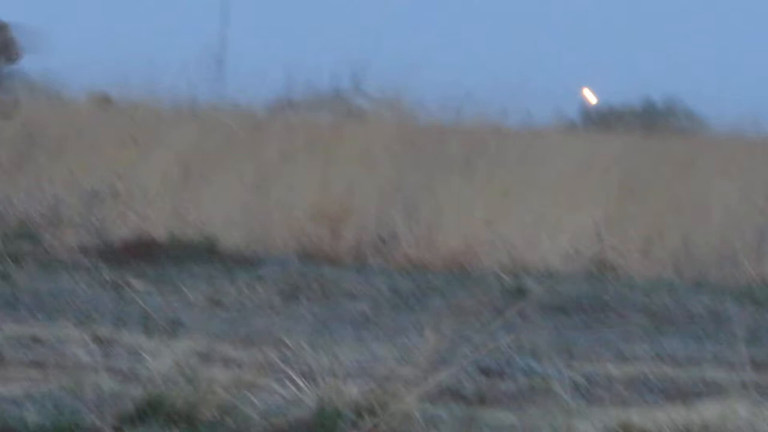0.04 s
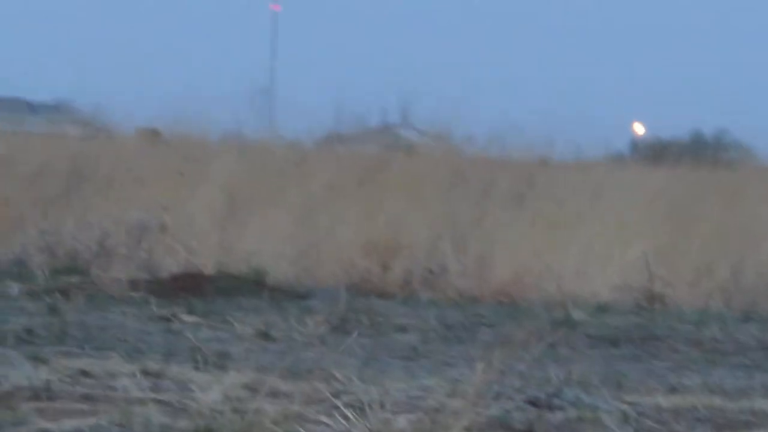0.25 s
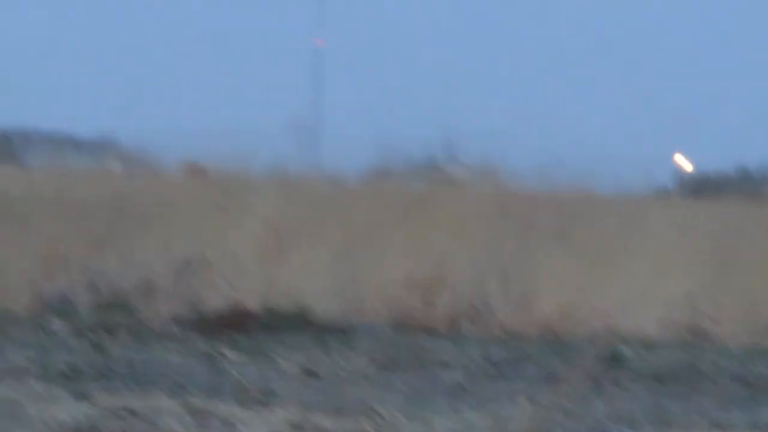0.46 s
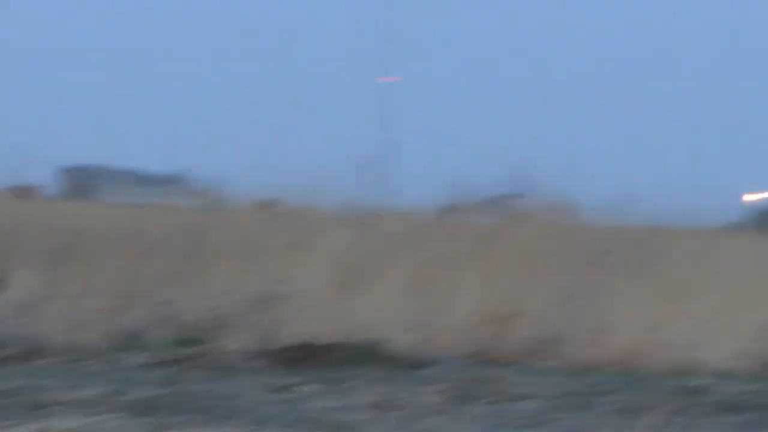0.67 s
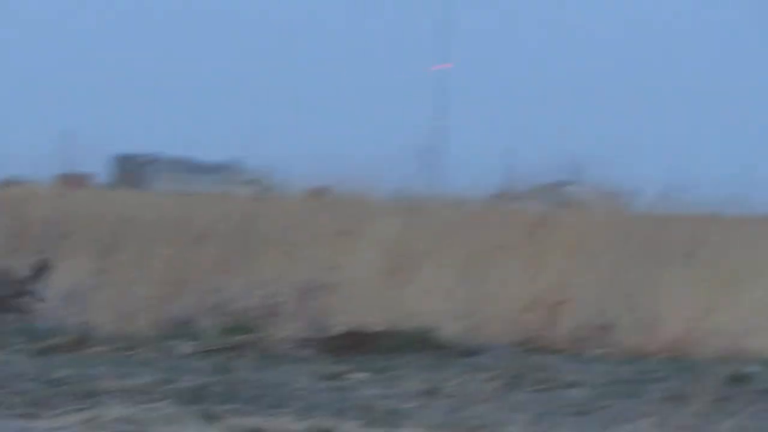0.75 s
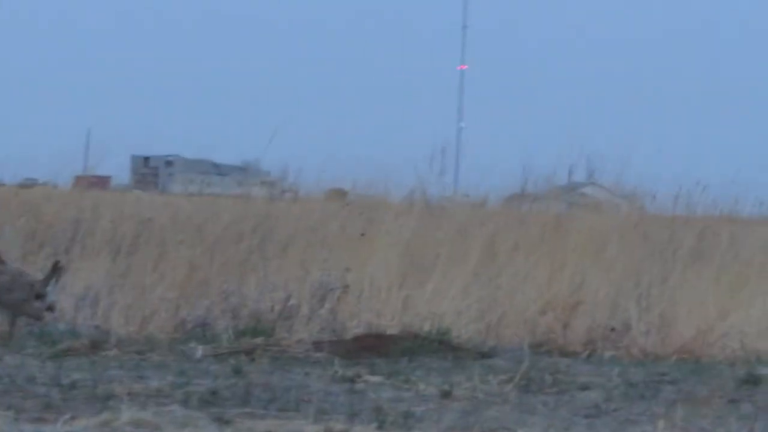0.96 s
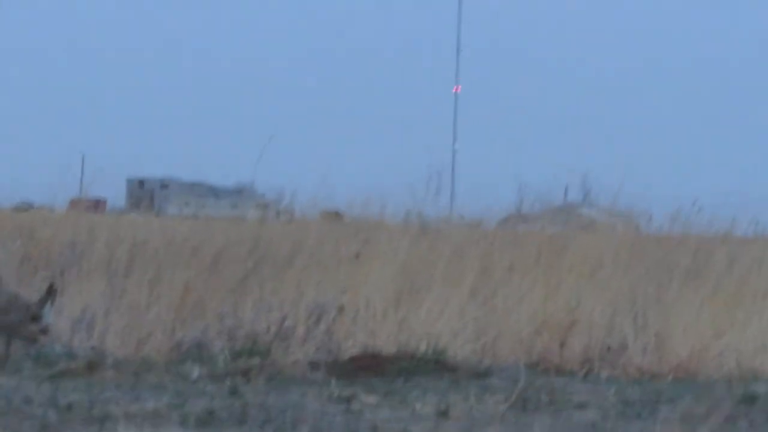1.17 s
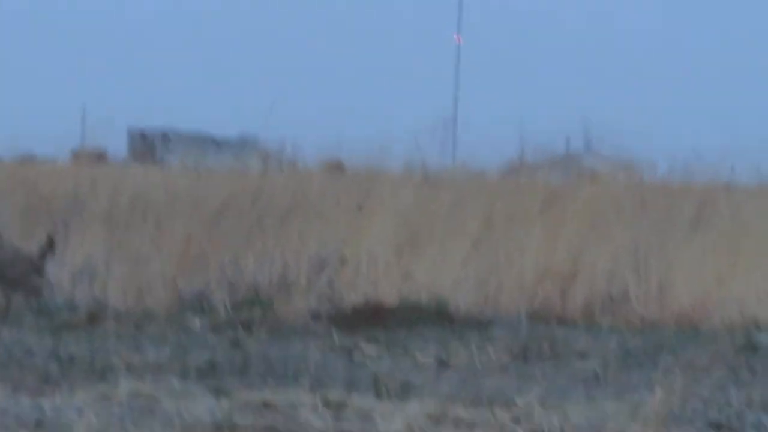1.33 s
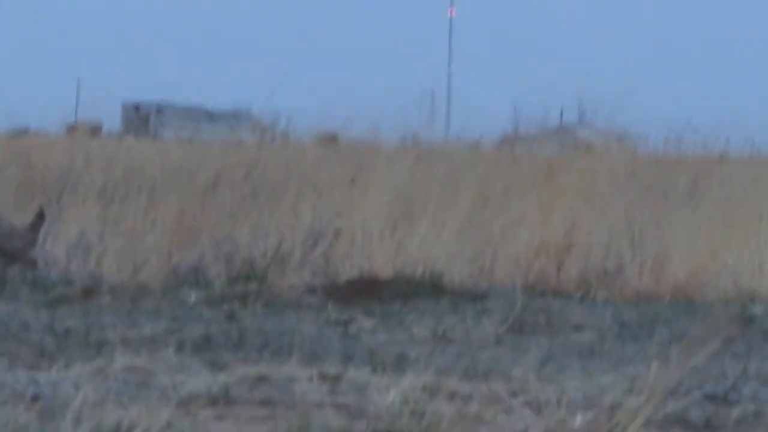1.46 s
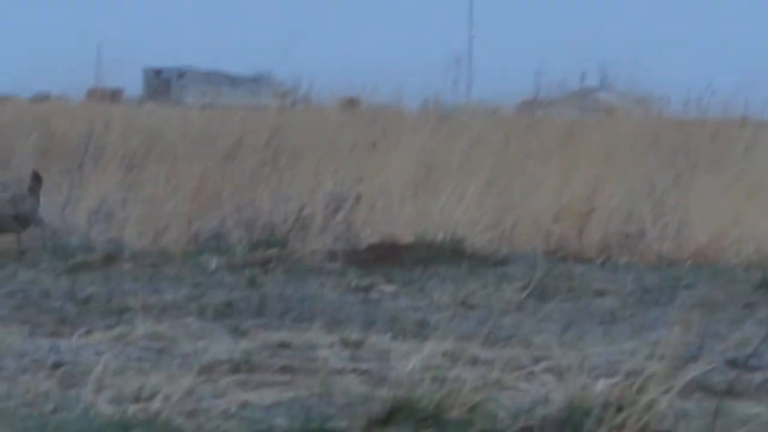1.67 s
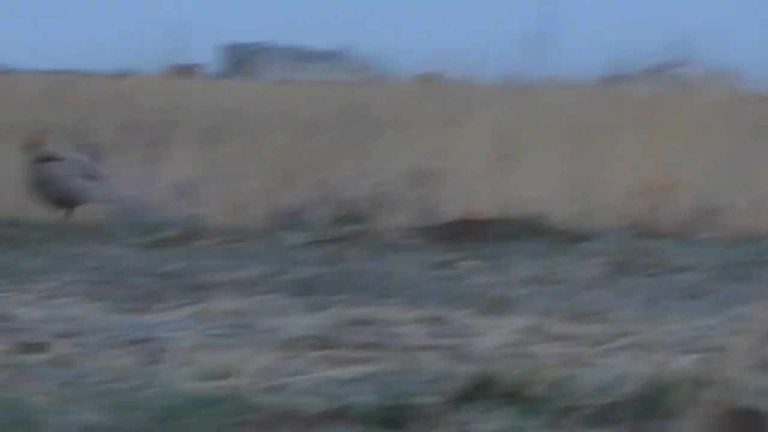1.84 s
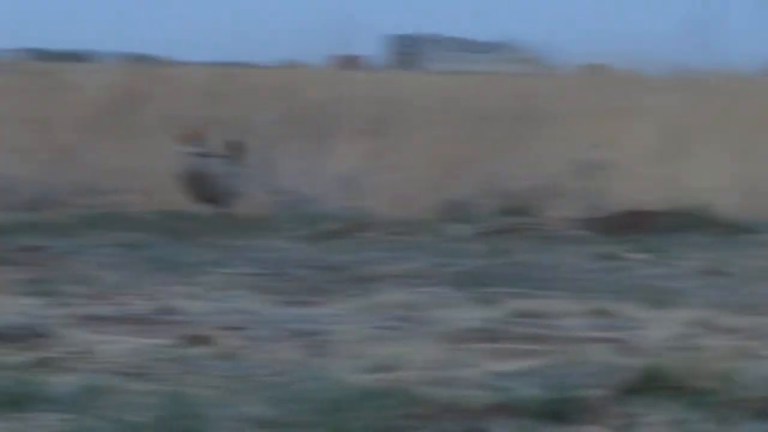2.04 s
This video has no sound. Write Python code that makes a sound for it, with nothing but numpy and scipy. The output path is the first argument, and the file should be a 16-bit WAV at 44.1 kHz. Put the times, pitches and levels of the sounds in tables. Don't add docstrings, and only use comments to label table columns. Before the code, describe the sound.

Distant grouse give short clucks and nasal whines, half buried under rumbling, overloading wind gusts

```python
import sys
import numpy as np
from scipy import signal
from scipy.fft import rfft, irfft, next_fast_len
from scipy.io import wavfile
from scipy.ndimage import uniform_filter1d, map_coordinates

SR = 44100
rng = np.random.default_rng(int(sys.argv[2]) if len(sys.argv) > 2 else 0)


def master_out(mix):
    frames = np.transpose(np.atleast_2d(mix))
    ceiling = np.clip(frames, -1, 1)
    pcm = np.round(ceiling * 32767).astype(np.int16)
    wavfile.write(sys.argv[1], SR, pcm)


def ratio_of_db(decibels):
    return 10 ** (np.asarray(decibels, float) / 20)


N = 92610

# (frequency [Hz], density [dB per Hz])
FIELD_SPECTRUM = [(250, -5), (500, -0.5), (1000, -1), (2000, -10), (3300, -16.5), (5000, -19),
                  (13300, -26.5), (15200, -64.5)]
# (frequency [Hz], correlation [-1..1])
FIELD_LIKENESS = [(500, 0.2), (1500, 0.75), (3000, .3), (6000, 0.07), (13000, -.4)]
# (start [s], length [s], rumble [dB], flutter over rumble [dB])
GUSTS = [(0.064, 0.198, -16, -15.5), (1.328, 0.076, -14.5, -13.5), (0.324, 0.032, -9, -17.5),
         (0.38, 0.098, -11, -24), (0.396, 0.032, -20, -5.5), (0.457, .035, -12, -16),
         (0.487, 0.031, -5.5, -12.5), (0.544, 0.013, -3.5, -11), (0.562, 0.03, 16.5, -7),
         (0.622, 0.027, 6.5, 3), (0.643, 0.026, 13.5, -33.5), (0.759, 0.023, 9.5, -15),
         (0.868, 0.021, -6, -28), (0.935, 0.016, 10.5, -10), (0.963, 0.051, 5, 2), (0.996, 0.023, 4.5, -24),
         (1.04, 0.038, 5, -6.5), (1.121, 0.073, 7.5, -20.5), (1.17, 0.053, 1, -5), (1.21, 0.032, 4, -6.5),
         (1.243, 0.043, 8.5, -1), (1.31, 0.071, -11, -7.5), (1.444, 0.036, -7, -10.5),
         (1.505, 0.028, 2, -25), (1.54, 0.077, -24, 7), (1.616, 0.055, -9, -5.5), (1.701, 0.051, -7, -14.5),
         (1.773, 0.054, -1.5, -17), (1.802, 0.039, -14.5, 0), (2.006, 0.018, -19.5, -10)]
# (frequency [Hz], density [dB per Hz])
RUMBLE_SPECTRUM = [(15, -16), (40, -3), (70, 1.5), (110, -1.5), (160, -7), (250, -27.5), (400, -83.5)]
# (frequency [Hz], density [dB per Hz])
FLUTTER_SPECTRUM = [(80, -41), (150, 2), (220, 2.5), (350, -8), (550, -23), (900, -36.5), (1500, -59),
                    (3000, -93)]
# (time [s], signed size [full scale], width [s])
PUSHES = [(0.5452, 1.5, 0.00079), (0.5477, 2.5, 0.00198), (0.5527, 0.9, 0.00053), (0.627, 3.5, 0.0017),
          (.648, -6.5, 0.00041), (.932, 5, 0.00039), (0.96, -5.5, 0.00056), (0.995, 7.5, 0.00055),
          (1.167, -1, 0.0019), (.98, 4.5, 0.00093), (1.004, -2, 0.00046), (1.2454, 9, 0.0012),
          (1.2591, 7.5, 0.0011), (1.581, 0.42, 0.00048)]
# (start [s], length [s], level [dB], from [Hz], to [Hz])
CHIRPS = [
    (.28, .03, -58, 3300, 3500),
    (2.04, .02, -52, 2330, 2230),
    (1.15, .05, -54, 2550, 2950),
]
# (start [s], length [s], level [dB], second-partial pitch [Hz], scoop [Hz])
CACKLES = [
    (0.247, 0.03, -34, 1478, 208),
    (0.36, 0.032, -33, 1546, 280),
    (0.472, 0.039, -42, 1267, 161),
    (1.656, 0.053, -40.5, 1420, 40),
    (1.81, .034, -44.5, 1464, 40),
    (1.955, 0.033, -40.5, 1443, 49.7),
]
# (time [s], pitch [Hz], level [dB])
YELP = [
    (.119, 1210, -51),
    (.132, 1318, -36.5),
    (.147, 1847, -34),
    (.158, 1372, -35.5),
    (.166, 1360, -31),
]
# (time [s], pitch [Hz], level [dB])
WHINES = [
    [(.515, 1280, -47.5), (.55, 1414, -49), (.6, 1560, -39), (.615, 1504, -34), (.645, 1814, -41)],
    [(.66, 1538, -43), (.705, 1515, -36.5), (.724, 1725, -41), (.742, 1474, -31.5), (.765, 1410, -42)],
    [(.912, 1269, -44), (.94, 1590, -45), (.98, 1597, -44), (1.04, 1545, -36.5), (1.074, 1380, -47)],
    [(1.205, 1330, -37), (1.245, 1600, -41), (1.27, 1466, -38.5), (1.315, 1470, -43)],
    [(1.44, 1446, -53), (1.456, 1590, -36), (1.48, 1632, -38), (1.51, 1572, -44), (1.528, 1390, -41)],
]
# (frequency [Hz], gain [dB])
THROAT = [(600, -36), (900, -27), (1300, -2), (1500, 0), (1800, -4), (2150, -16), (2500, -19), (2900, -34)]
# (time [s], gain [dB])
GAIN = [(0, -2), (.4, -1), (.55, -2.5), (.556, -26), (.8, -22), (1.1, -18), (1.24, -17.5), (1.246, -21.5),
        (1.5, -18), (1.75, -12.5), (2.1, -7.5)]
# (time [s], level [dB])
TICKS = [(.175, -37), (.34, -39), (.5448, -28), (.5478, -32), (.5497, -27), (.5522, -34), (.555, -34),
         (.6505, -36), (1.045, -40), (1.2407, -33), (1.2432, -23), (1.546, -45), (1.58, -43), (1.77, -43)]
# (centre [Hz], width [Hz])
SEAMS = [(3950, 200), (7900, 82)]

FIELD_DB = -46
WHISTLE_HZ, WHISTLE_CLIMB_HZ_PER_S, WHISTLE_DB = 8680, 95, -67
GUST_RISE_S, GUST_FALL_S = 0.003, 0.013
LULL_DB, LULL_FLUTTER_DB, LUMPS_DB, SHIELD_DB = -19, -21, 2, -5
PORT_TILT_DB, PORT_OWN_DB, OWN_BRIGHT_DB = 1.2344, -13.5, 3.5
ATTACK_S, RELEASE_S = 0.0035, 0.0059
SCOOP_S, SAG_SHARE = 0.0031, 0.8
CACKLE_FLUTTER_DB, WHINE_FLUTTER_DB = 1.6, 1.8
WAVER_SHARE, OWN_SHARE = 0.008, 1.2
SLAP_S, SLAP_DB = 0.024, -12.5
LEFT_LAG_SAMPLES = 2
START_S = 0.0945
TICK_S, TICK_RIGHT = 0.00002, -0.3
CLIP_TOP, CLIP_HARDNESS = 1.0, 60


def unit(x):
    return x / np.sqrt(np.mean(x ** 2) + 1e-20)


def along(points, hz):
    f, v = np.transpose(points)
    return np.interp(np.log(hz + 1), np.log(f + 1), v)


def wobble(rate_hz, count=N):
    knots = rng.standard_normal(1024)
    return map_coordinates(knots, [np.arange(count) * rate_hz / SR])


def filtered(x, response):
    m = next_fast_len(N + 8192)
    hz = np.fft.rfftfreq(m, 1 / SR)
    return irfft(rfft(x, m) * response(hz), m)[..., :N]


def noise(spectrum, count):
    white = rng.standard_normal((count, N))
    return unit(filtered(white, lambda hz: ratio_of_db(along(spectrum, hz)) * (hz > 10)))


def steady(x, span_s):
    power = np.abs(uniform_filter1d(x[0] ** 2, size=int(span_s * SR)))
    return x / np.sqrt(power + 0.076)


def field():
    def side_gain(hz):
        return np.tan(np.arccos(np.clip(along(FIELD_LIKENESS, hz), -0.9, 1)) / 2)

    t = np.arange(N) / SR
    mid, side = filtered(noise(FIELD_SPECTRUM, 2), lambda hz: np.array([np.ones_like(hz), side_gain(hz)]))
    hiss = ratio_of_db(FIELD_DB + 1.95 * wobble(8.7)) * np.array([mid + side, mid - side])
    cycles = (WHISTLE_HZ + WHISTLE_CLIMB_HZ_PER_S * t / 2) * t
    whistle = np.sin(2 * np.pi * cycles + 0.95 * wobble(25))
    return hiss + ratio_of_db(WHISTLE_DB + 0.73 * wobble(41)) * whistle


def port_air(spectrum, span_s, power, lumps_hz, own_db):
    shares = ratio_of_db(np.array([[0], [own_db], [own_db]]))
    turbulence = steady(noise(spectrum, 3), span_s) * shares
    return np.sqrt(power) * ratio_of_db(LUMPS_DB * wobble(lumps_hz)) * turbulence


def wind():
    t = np.arange(N) / SR
    low = ratio_of_db(2 * LULL_DB)
    high = ratio_of_db(2 * (LULL_DB + LULL_FLUTTER_DB))
    for s, length_s, db, bright_db in GUSTS:
        rise = np.clip((t - s) / GUST_RISE_S, -20, 0)
        fall = np.clip((t - s - length_s) / GUST_FALL_S, 0, 20)
        shape = np.exp(rise - fall) ** 2
        low = low + shape * ratio_of_db(2 * db)
        high = high + shape * ratio_of_db(2 * (db + bright_db))
    low, high = uniform_filter1d(np.array([low, high]), size=120)
    rumble = port_air(RUMBLE_SPECTRUM, 0.0303, low, 39.95, PORT_OWN_DB)
    flutter = port_air(FLUTTER_SPECTRUM, 0.0123, high, 70, PORT_OWN_DB + OWN_BRIGHT_DB)
    air = ratio_of_db(SHIELD_DB) * (rumble + flutter)
    shared = air[0] + sum(size * np.exp(-((t - s) / width_s) ** 2) for s, size, width_s in PUSHES)
    return shared * np.array([[ratio_of_db(PORT_TILT_DB)], [-ratio_of_db(-PORT_TILT_DB)]]) + air[1:]


def voice(t, hz, level_db, flutter_db):
    count = len(t)
    gate = np.clip((t - t[0]) / ATTACK_S, 0, 1) * np.clip((t[-1] - t) / RELEASE_S, 0, 1)
    f0 = hz / 2 * (1 + WAVER_SHARE * wobble(150, count))
    phase = 2 * np.pi * np.cumsum(f0) / SR
    tone = np.zeros(count)
    for k in range(1, 5):
        own_db = OWN_SHARE * flutter_db * wobble(71, count)
        tone += ratio_of_db(along(THROAT, k * f0) + own_db) * np.sin(k * phase)
    return np.sqrt(2) * gate * ratio_of_db(level_db + flutter_db * wobble(115, count)) * tone


def cackles():
    t, out = np.arange(N) / SR, np.zeros(N)
    for s, length_s, db, hz, scoop_hz in CACKLES:
        on = (t >= s) & (t < s + length_s)
        u = t[on] - s
        bend = np.exp(-u / SCOOP_S) + SAG_SHARE * (u / length_s) ** 2
        out[on] += voice(t[on], hz - scoop_hz * bend, db, CACKLE_FLUTTER_DB)
    return out


def whines():
    t, out = np.arange(N) / SR, np.zeros(N)
    for rows in [YELP] + WHINES:
        s, hz, db = np.transpose(rows)
        on = (t >= s[0]) & (t < s[-1])
        glide = uniform_filter1d(np.interp(t[on], s, hz), size=250)
        out[on] += voice(t[on], glide, np.interp(t[on], s, db), WHINE_FLUTTER_DB)
    return out


def chirps():
    t, out = np.arange(N) / SR, np.zeros(N)
    for s, length_s, db, from_hz, to_hz in CHIRPS:
        u = np.clip((t - s) / length_s, 0, 1)
        phase = 2 * np.pi * np.cumsum(from_hz + (to_hz - from_hz) * u) / SR
        out += ratio_of_db(db) * np.sin(np.pi * u) * np.sin(phase)
    return out


def birds():
    calls = cackles() + whines() + chirps()
    calls = calls + ratio_of_db(SLAP_DB) * np.roll(calls, round(SLAP_S * SR))
    tail_s = np.arange(SR // 10) / SR
    echo = rng.standard_normal((2, SR // 10)) * ratio_of_db(-60 * tail_s / 0.28)
    wet = signal.fftconvolve(calls[None], echo / np.linalg.norm(echo[0]), axes=1)[:, :N]
    direct = np.array([np.roll(calls, LEFT_LAG_SAMPLES), calls]) * ratio_of_db(np.array([[0.2], [-0.2]]))
    return direct + ratio_of_db(-15.5) * wet


def scene():
    return field() + wind() + birds()


def ticks():
    t = np.arange(N) / SR
    clicks = sum(ratio_of_db(db) * (t >= s) * np.exp(-np.abs(t - s) / TICK_S) for s, db in TICKS)
    return clicks * np.array([[1], [TICK_RIGHT]])


def roll_off(x):
    return signal.sosfilt(signal.butter(12, 15800, fs=SR, output="sos"), x)


def record(dry):
    def gaps(hz):
        return np.prod([1 - 0.75 * np.exp(-((hz - c) / w) ** 2) for c, w in SEAMS], axis=0)

    t = np.arange(N) / SR
    opening = np.clip((t - START_S) * SR / 10, 0, 1)
    x = filtered(dry, gaps) * ratio_of_db(np.interp(t, *np.transpose(GAIN))) * opening
    x = x / (1 + np.abs(x / CLIP_TOP) ** CLIP_HARDNESS) ** (1 / CLIP_HARDNESS)
    return roll_off(x + ticks())


dry = scene()
out = record(dry)
master_out(out)
```